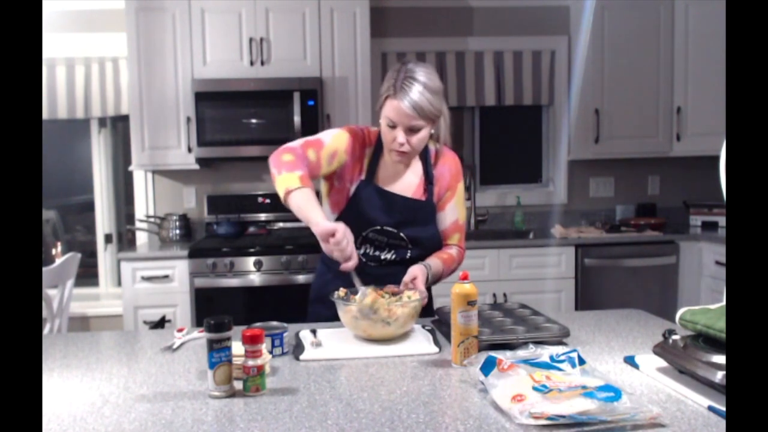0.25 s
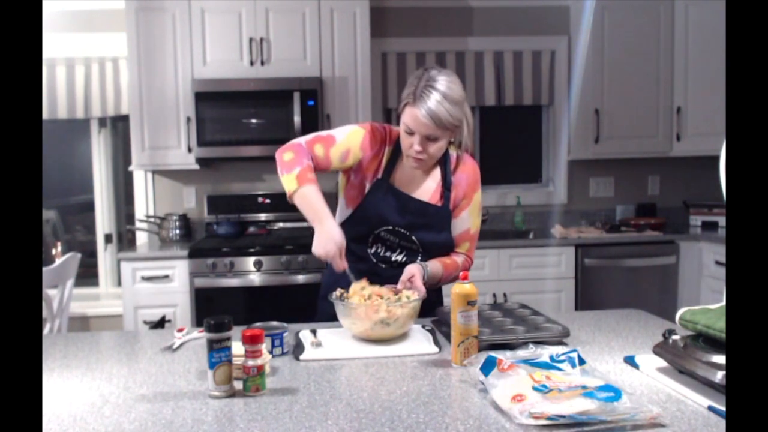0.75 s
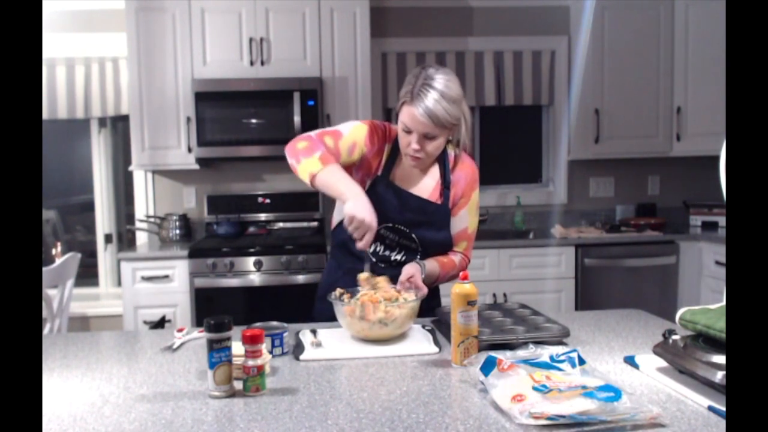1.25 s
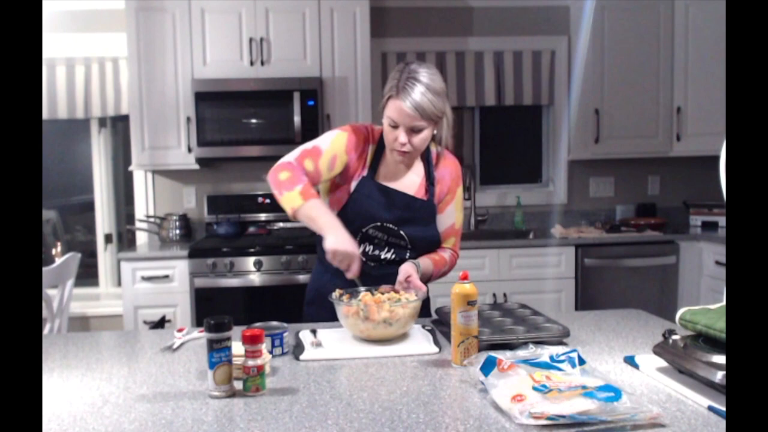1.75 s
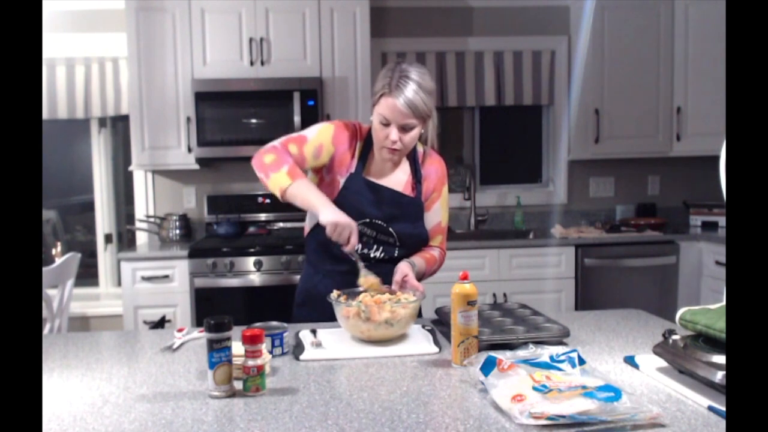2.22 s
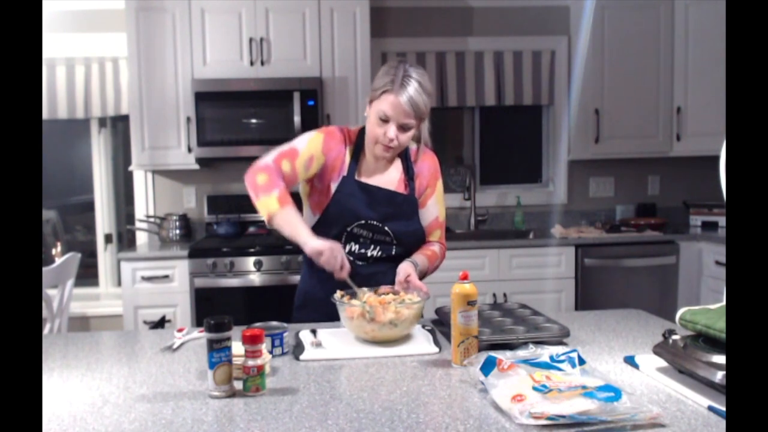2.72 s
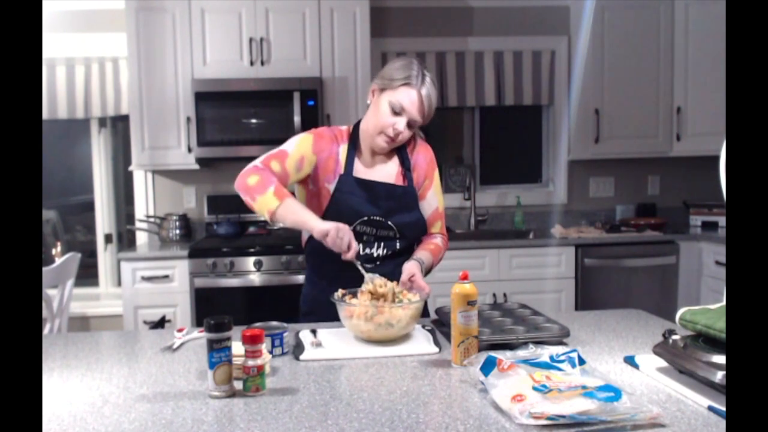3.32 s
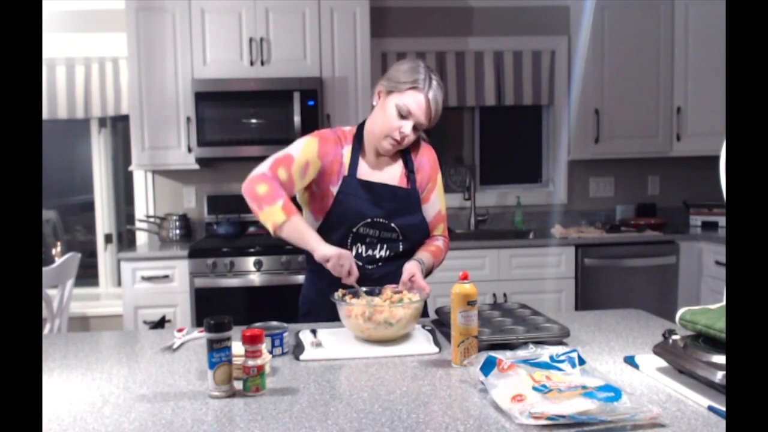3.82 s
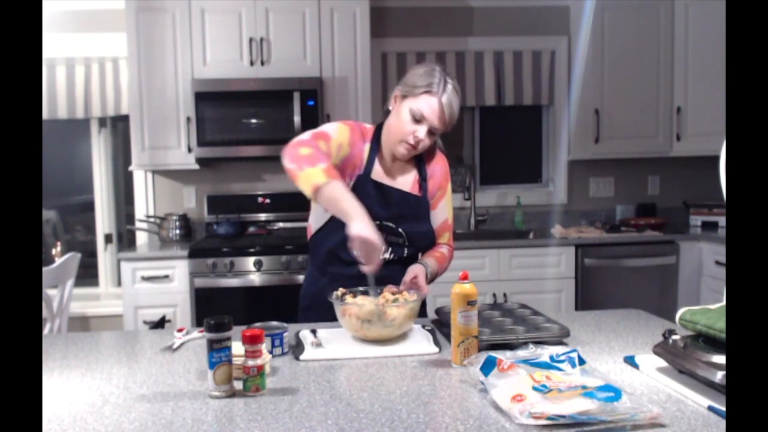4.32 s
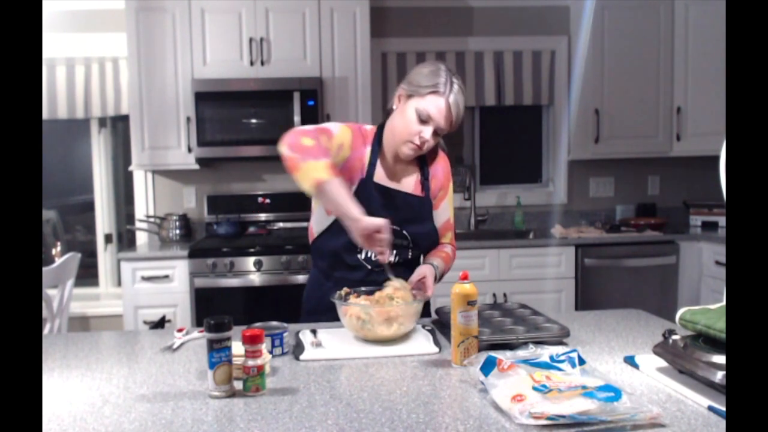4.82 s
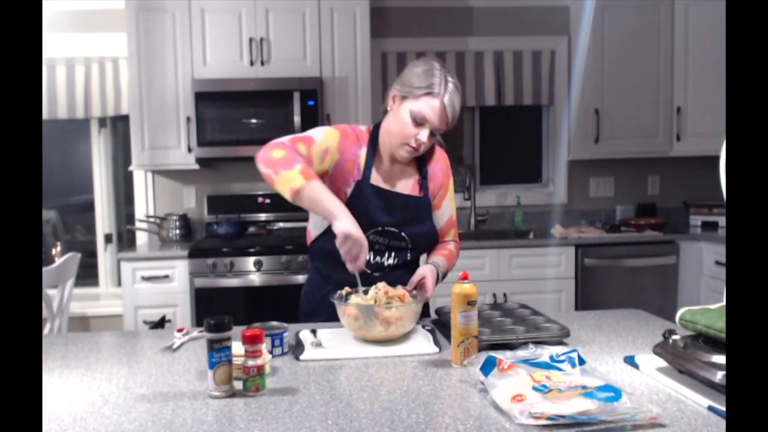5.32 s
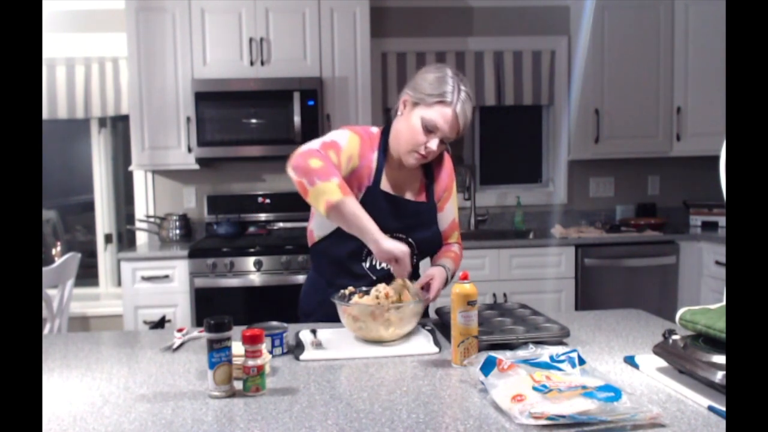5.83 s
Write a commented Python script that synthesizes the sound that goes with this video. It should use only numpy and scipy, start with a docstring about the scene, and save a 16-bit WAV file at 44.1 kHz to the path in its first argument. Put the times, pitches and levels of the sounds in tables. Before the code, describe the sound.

Over a steady appliance hum, a thick wet mixture is stirred in a glass bowl, the spoon knocking softly and occasionally clinking.

```python
"""In a bare kitchen, a few steps away, a metal spoon stirs a thick filling in a glass bowl.
Appliances hum in the background. The filling squelches and crackles with each stroke and muffles
most contacts into dull knocks and small ticks. A few times the spoon skids on bare glass or hits it
with a clink that rings the bowl, the spoon and the cutting board underneath.
A limiter turns the sound down for a moment at the hardest clinks."""
import sys
import numpy as np
from scipy import signal
from scipy.fft import rfft, irfft, next_fast_len
from scipy.io import wavfile
from scipy.ndimage import map_coordinates

SR = 44100
rng = np.random.default_rng(int(sys.argv[2]) if len(sys.argv) > 2 else 0)


def int16_out(signal):
    """Quantize to a 16-bit WAV file."""
    q = np.round(np.clip(np.atleast_2d(signal).T, -1, 1) * 32767)
    wavfile.write(sys.argv[1], SR, q.astype(np.int16))


N = 267246
TOP_HZ = 15950  # the sound is cut off above this

# Early echoes off hard surfaces: delay_s, gain
ECHOES = [(.0055, 0.5), (0.014, 0.39), (.022, .25), (.030, 0.24)]
# How long the room takes to fade by 60 dB: frequency_hz, fade_s
ROOM_FADE = [(200, 0.16), (600, 0.15), (1400, 0.3), (2600, 0.35), (7000, 0.27), (15000, 0.17)]
# Tone colour of the rushing fans: frequency_hz, level_db
FAN_SPECTRUM = [(20, -42.5), (40, -26), (65, -7.5), (160, -4.5), (240, -6.5), (400, -5), (600, -22),
                (860, -13), (1100, -17.5), (2000, -30.5), (3200, -34), (6000, -31.5), (10000, -36),
                (14000, -62)]
# Tones of the motors: pitch_hz, level_db
MOTOR_TONES = [(43, -76), (66, -64), (165, -58.5), (209, -57.5), (264, -59), (371, -64), (424, -63),
               (495, -64.5), (888, -67)]
# Strokes through the filling: peak_s, length_s, squelch_db, crackle_db
STROKES = [(0.227, 0.084, -47, -58.5), (0.425, 0.31, -48.5, -59), (0.687, 0.25, -54, -59),
           (1.142, 0.26, -53.5, -59.5), (1.44, 0.17, -51, -59.5), (1.758, 0.2, -50.5, -64.5),
           (2.035, 0.12, -48.5, -58.5), (2.404, 0.27, -51.5, -59), (3.125, 0.17, -48, -53),
           (3.32, 0.6, -58, -59), (3.52, 0.18, -54, -60), (3.92, 0.13, -51, -67), (4.4, 0.23, -53, -56.5),
           (4.673, .16, -57.5, -64), (4.923, 0.18, -53, -55), (4.995, 0.16, -54.5, -57.5),
           (5.3, 0.18, -54.5, -66), (5.51, 0.11, -49, -58), (5.667, 0.2, -50.5, -60.5),
           (6.03, 0.29, -91, -61.5)]
# Tone colours of the low squelch and the bright, wet crackle: frequency_hz, level_db
SQUELCH_SPECTRUM = [(300, -1.5), (700, -3.5), (1200, -0.5), (2000, -1.5), (3000, -13.5), (5000, -13.5),
                    (10000, -39.5)]
CRACKLE_SPECTRUM = [(1000, -19.5), (2500, 2.5), (4200, 2), (6500, 1), (9000, -8), (12000, -6), (14000, -31),
                    (16000, -59.5)]
# The bowl rocks on the board: start_s, level_db
THUMPS = [(5.206, -11), (5.386, -11)]
# Ticks of the spoon's edge and of bursting air pockets: start_s, level_db, pitch_hz
TICKS = [(0.629, -20, 2560), (1.9624, -10.5, 3750), (1.9632, -22, 6700), (2.293, -25, 4000),
         (2.346, -31, 3100), (3.066, -30, 3580), (3.098, -27, 6200), (3.521, -24, 4600),
         (3.888, -23.5, 3950), (4.275, -4.5, 2340), (4.788, -27.5, 5500), (5.273, -26, 4250),
         (5.484, -26, 4180), (5.815, -26.5, 6000)]
# Thin, high flicks of the spoon's edge on the glass: start_s, level_db, pitch_hz
FLICKS = [(1.963, -18.5, 15000), (1.9637, -21.5, 10600), (3.142, -16.5, 11560)]
# Knocks through the filling: start_s, level_db, pitch_hz, width_hz, second_knock_weaker_db
KNOCKS = [(.614, -16.5, 1240, 600, 8), (1.070, -2, 1294, 620, 17), (1.367, -14, 1330, 910, 0.5),
          (1.963, -20, 1270, 900, 0), (2.265, -4.5, 1386, 187, 17), (2.335, -12.5, 2090, 550, 0.5),
          (3.156, .5, 1294, 426, 0), (3.508, -19, 1320, 900, 9), (3.734, -20.5, 1940, 700, 15),
          (3.884, -12.5, 1820, 445, 19), (4.263, 2.5, 1410, 292, 6.5), (5.046, -19.5, 1130, 515, 25),
          (5.242, -10, 1200, 470, 25), (5.282, -17.5, 1570, 260, 6), (5.3916, -14, 1220, 420, 25)]
# Skids along the bare glass: start_s, level_db, lowest_hz, highest_hz
SKIDS = [(2.606, -17.5, 2490, 5000), (4.1838, 3, 1200, 12000), (4.254, -2, 3150, 5000)]
# Glass tones that a skid wakes: pitch_hz, level_db, width_hz, delay_s
SKID_TONES = [(2622, 3, 110, .011), (4056, -2.5, 170, 0), (5580, -26, 110, 0.011), (7350, -14, 100, 0.0093)]
# Ringing tones of each part (the filling quickly damps the glass): pitch_hz, energy_db, fade_s
BOWL_TONES = [(1409, -3.5, 0.069), (2615, -0.5, 0.022), (4140, -14, 0.017), (6020, -21, 0.033),
              (7390, -1.5, 0.0073), (9300, -17.5, 0.027)]
SPOON_TONES = [(2537, 10, 0.022), (2934, -4.5, 0.083), (4195, 1.5, 0.016), (4560, -6, 0.031),
               (6900, 0, 0.0077), (10130, -3, 0.03)]
BOARD_TONES = [(538, 12.4, 0.028), (730, 4.2, 0.02), (1161, 7.1, 0.047), (1361, 6, 0.13)]
RIM_TONES = [(870, -4.5, 0.025), (2337, 7.5, 0.02), (4120, 3.5, 0.023), (5700, 3.5, 0.036),
             (9160, -4.5, 0.01), (14200, -7, .012)]
# Tone colour of the crack of a hard hit: frequency_hz, level_db
CRACK_SPECTRUM = [(30, -52), (300, -30), (900, -5), (2000, -7), (3400, 10), (4400, 4.5), (6500, -0.5),
                  (8500, -2.5), (10000, -1.5), (13500, -6.5), (16000, -4.5)]
# Hits on bare glass: start_s, bowl_db, spoon_db, board_db, rim_db, cutoff_hz
CLINKS = [(0.2423, 15, 14, 12, -19, 6700), (0.2464, 8.5, 6.5, 3, -18, 8850),
          (2.597, -8.5, -37, -17, -41, 1500), (2.6059, 6.5, -19, -29, -33, 1390),
          (2.6222, 26.5, 19.5, 14, 32.5, 16400), (4.185, -2, -40, -46, -22, 9000),
          (4.253, -17, -11, -10.5, -17, 7980)]


def amp(db):
    """Turn decibels into a gain."""
    return 10 ** (np.asarray(db) / 20)


def unit_rms(x):
    """Scale a sound to an average (rms) level of 1."""
    return x / np.sqrt(np.mean(x ** 2) + 1e-20)


def unit_energy(x):
    """Scale a sound to a total energy of 1."""
    return x / (np.linalg.norm(x) + 1e-12)


def value_at(points, hz):
    """Read between the rows of a (frequency_hz, value) table, on a log frequency scale."""
    frequencies, values = np.transpose(points)
    return np.interp(np.log(hz + 1), np.log(frequencies + 1), values)


def wobble(per_second):
    """A smooth curve through this many random values a second."""
    values = rng.standard_normal(int(N * per_second / SR) + 4)
    return map_coordinates(values, [np.arange(N) * per_second / SR])


def filtered(x, gain_at):
    """Turn each frequency up or down by gain_at(hz)."""
    size = next_fast_len(len(x) + SR // 4)
    return irfft(rfft(x, size) * gain_at(np.fft.rfftfreq(size, 1 / SR)), size)[:len(x)]


def coloured(x, spectrum):
    """Give a sound the tone colour in a table, at an average level of 1."""
    return unit_rms(filtered(x, lambda hz: amp(value_at(spectrum, hz))))


def add(track, start_s, sound):
    """Mix a sound into a track."""
    part = track[round(start_s * SR):][:len(sound)]
    part += sound[:len(part)]


def tap(hz, width_hz):
    """One push rings one tone, padded by the filling; a narrower width rings longer."""
    edges = np.clip([hz - width_hz / 2, hz + width_hz / 2], 20, SR / 2 - 1)
    band = signal.butter(2, edges, "bandpass", fs=SR)
    tone = signal.lfilter(*band, signal.unit_impulse(SR // 16))
    cushion = signal.butter(4, min(1.28 * hz, TOP_HZ), "lowpass", fs=SR)
    return unit_energy(signal.lfilter(*cushion, tone))


def ring(tones):
    """A struck part rings with tones that each drop 60 dB in fade_s; small parts give off no bass."""
    t = np.arange(SR // 8) / SR
    sound = sum(amp(db) * unit_energy(np.sin(2 * np.pi * hz * t) * amp(-60 * t / fade_s))
                for hz, db, fade_s in tones)
    bass_cut = signal.butter(2, 1.21 * tones[0][0], "highpass", fs=SR)
    return unit_energy(signal.lfilter(*bass_cut, sound))


def click(spectrum, size=2048):
    """The shortest, most sudden pulse that has this tone colour."""
    gains = amp(value_at(spectrum, np.fft.rfftfreq(size, 1 / SR)))
    cepstrum = irfft(np.log(gains))
    # folding the second half onto the first packs the energy at the start
    cepstrum[1:size // 2] *= 2
    cepstrum[size // 2 + 1:] = 0
    return unit_energy(irfft(np.exp(rfft(cepstrum))))


def kitchen(x, room_db, build_s=0.00067):
    """The sound arrives directly, then as a few hard echoes and a fading wash of reflections."""
    hz, t, noise = signal.stft(rng.standard_normal(SR // 2), SR, nperseg=256)
    fade = amp(-60 * t / value_at(ROOM_FADE, hz)[:, None])
    build_up = 1 - np.exp(-t / build_s)
    room = unit_energy(signal.istft(noise * fade * build_up, SR, nperseg=256)[1])
    for delay_s, gain in ECHOES:
        room[round(delay_s * SR)] += gain
    room *= amp(room_db)
    room[0] += 1  # the direct sound
    return signal.fftconvolve(x, unit_energy(room))


def appliances(fan_db=-49):
    """Fans rush and motors hum with slightly unsteady tones."""
    t = np.arange(N) / SR
    hum = sum(amp(db) * unit_rms(np.sin(2 * np.pi * hz * t + wobble(6.8))) for hz, db in MOTOR_TONES)
    return hum + amp(fan_db) * coloured(rng.standard_normal(N), FAN_SPECTRUM)


def wet_films(spectrum, per_second, spread_db, spots=5):
    """Tiny wet films tear at random, at several spots that each reach the room differently."""
    sizes = amp(spread_db * np.minimum(rng.exponential(size=(spots, N)), 3))
    tearing = rng.random((spots, N)) < per_second / spots / SR
    tears = tearing * sizes * rng.choice([-1, 1], (spots, N))
    return coloured(sum(kitchen(spot, room_db=5)[:N] for spot in tears), spectrum)


def filling(rise_share=0.45, rest_squelch_db=-60, rest_crackle_db=-64.5):
    """The filling squelches and crackles with each stroke and settles quietly in between."""
    t = np.arange(N) / SR
    squelch_power, crackle_power = amp(rest_squelch_db) ** 2, amp(rest_crackle_db) ** 2
    for peak_s, length_s, squelch_db, crackle_db in STROKES:
        reach_s = length_s * np.where(t < peak_s, rise_share, 1 - rise_share)
        push = 1 / (1 + ((t - peak_s) / reach_s) ** 2)
        squelch_power += (amp(squelch_db) * push) ** 2
        crackle_power += (amp(crackle_db) * push) ** 2
    squelch = np.sqrt(squelch_power) * wet_films(SQUELCH_SPECTRUM, per_second=350, spread_db=6.5)
    crackle = np.sqrt(crackle_power) * wet_films(CRACKLE_SPECTRUM, per_second=450, spread_db=7.5)
    return amp(wobble(25)) * (squelch + crackle)  # the level wavers by about 1 dB


def thumps():
    """The bowl rocks on the board with a low thump."""
    out = np.zeros(N)
    for start_s, db in THUMPS:
        add(out, start_s, kitchen(amp(db) * tap(hz=158, width_hz=64), room_db=1))
    return out


def ticks():
    """Air pockets burst and the spoon's edge ticks and flicks the glass: short, bright sounds."""
    out = np.zeros(N)
    for start_s, db, hz in TICKS:
        add(out, start_s, kitchen(amp(db) * tap(hz, width_hz=0.29 * hz), room_db=-4))
    for start_s, db, hz in FLICKS:
        add(out, start_s, kitchen(amp(db) * tap(hz, width_hz=650), room_db=2))
    return out


def knocks(catch_s=0.017):
    """The spoon knocks dully through the filling, drags on and catches once more."""
    out = np.zeros(N)
    for start_s, db, hz, width_hz, weaker_db in KNOCKS:
        knock = amp(db) * tap(hz, width_hz)
        add(out, start_s, kitchen(knock, room_db=0))
        add(out, start_s + catch_s, kitchen(amp(-weaker_db) * knock, room_db=-0.5))
    return out


def skids():
    """Sliding metal makes the glass sing; each skid wakes its own range of the tones."""
    out, song = np.zeros(N), np.zeros(SR // 8)
    for hz, db, width_hz, delay_s in SKID_TONES:
        add(song, delay_s, amp(db) * tap(hz, width_hz))
    for start_s, db, lowest_hz, highest_hz in SKIDS:
        band = signal.butter(2, [lowest_hz, highest_hz], "bandpass", fs=SR)
        add(out, start_s, kitchen(amp(db) * signal.lfilter(*band, song), room_db=-2))
    return out


def clinks(crack_db=3, chatter_s=0.0032):
    """A hit on bare glass rings bowl, spoon, board and rim; a softer hit loses the high tones."""
    crack = amp(crack_db) * click(CRACK_SPECTRUM)
    rim = ring(RIM_TONES)
    add(rim, 0, crack)
    # metal chatters on the glass for a moment after the crack
    t = np.arange(SR // 50) / SR
    chatter = unit_energy(rng.standard_normal(len(t)) * np.exp(-t / chatter_s))
    add(rim, 0, np.convolve(crack, chatter))
    out = np.zeros(N)
    for start_s, bowl_db, spoon_db, board_db, rim_db, cutoff_hz in CLINKS:
        hit = (amp(bowl_db) * ring(BOWL_TONES) + amp(spoon_db) * ring(SPOON_TONES)
               + amp(board_db) * ring(BOARD_TONES) + amp(rim_db) * unit_energy(rim))
        soften = signal.butter(3, cutoff_hz, "lowpass", fs=SR)
        add(out, start_s, kitchen(signal.lfilter(*soften, hit), room_db=-1.5))
    return out


def scene():
    """Spoon, bowl and filling over the hum of the kitchen, in one channel."""
    return (clinks() + skids() + knocks() + thumps() + ticks() + filling() + appliances())[None]


def limiter(x, threshold_db=-11, release_db_per_s=75, attack_s=0.011):
    """The volume drops within milliseconds of a loud sound, then creeps back."""
    smoothing = np.exp(-1 / (attack_s * SR))
    power = signal.lfilter([1 - smoothing], [1, -smoothing], x ** 2)
    excess_db = np.maximum(10 * np.log10(power + 1e-12) - threshold_db, 0)
    recovery_db = release_db_per_s * np.arange(N) / SR
    cut_db = np.maximum.accumulate(excess_db + recovery_db) - recovery_db
    return x * amp(-cut_db)


def record(dry):
    """Turn down loud moments, clip the peaks that remain and cut the highest treble."""
    clipped = np.clip(limiter(dry[0]), -1, 1)
    return filtered(clipped, lambda hz: np.clip((TOP_HZ - hz) / 300, 0, 1))[None]


dry = scene()
out = record(dry)
int16_out(out)
```